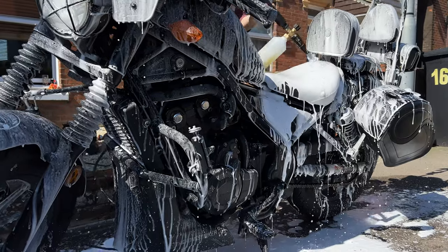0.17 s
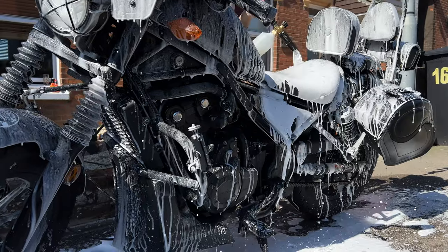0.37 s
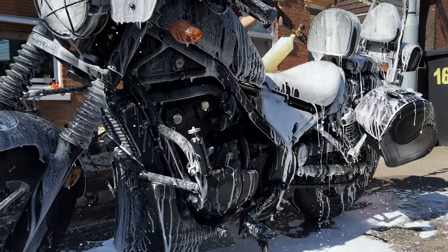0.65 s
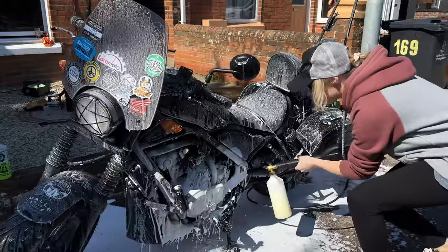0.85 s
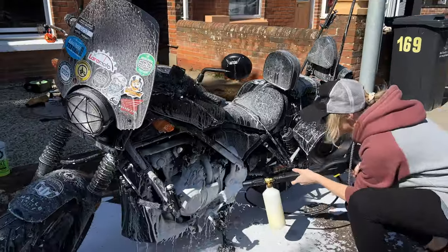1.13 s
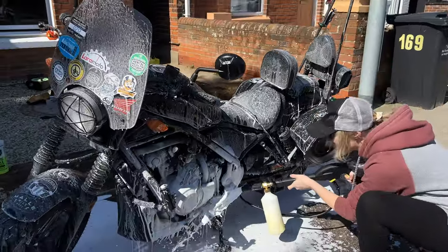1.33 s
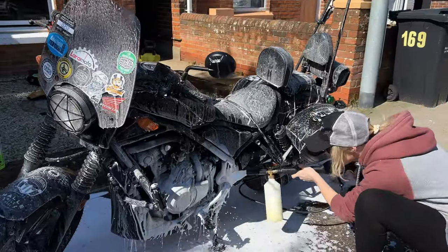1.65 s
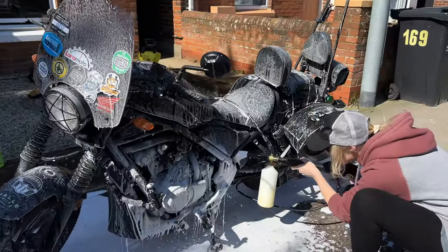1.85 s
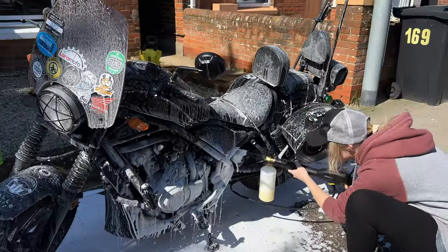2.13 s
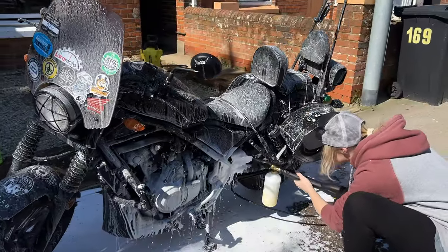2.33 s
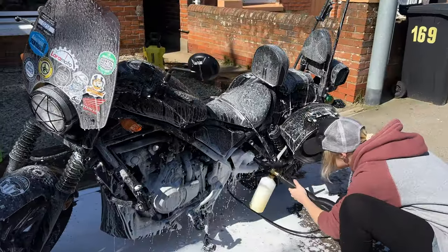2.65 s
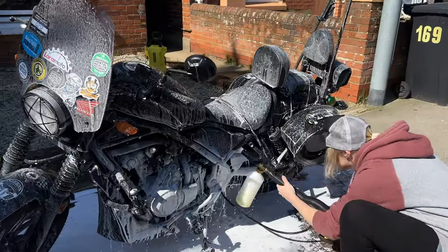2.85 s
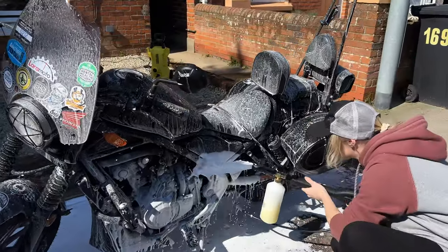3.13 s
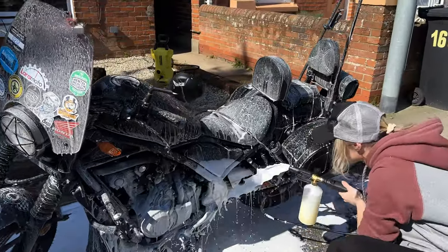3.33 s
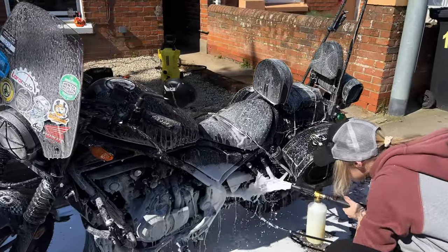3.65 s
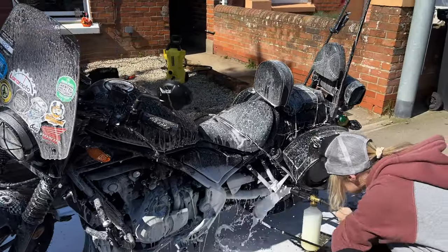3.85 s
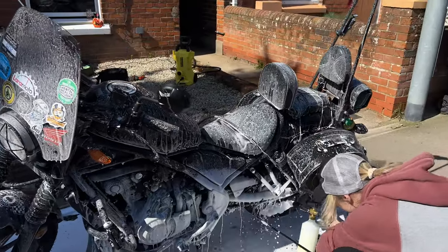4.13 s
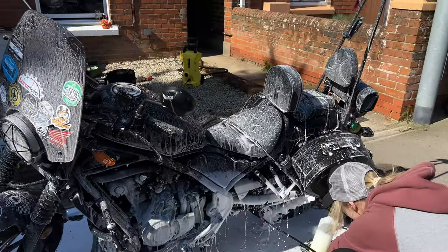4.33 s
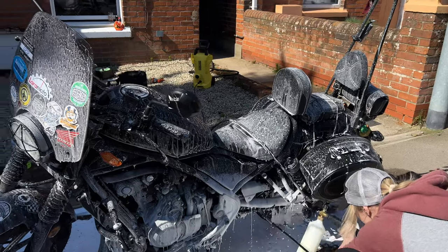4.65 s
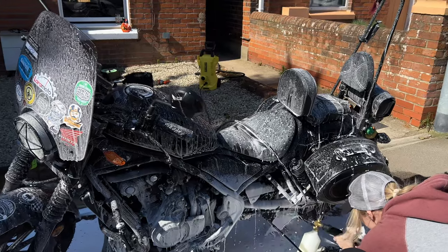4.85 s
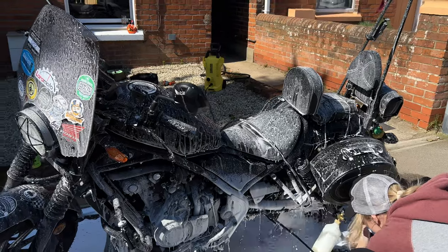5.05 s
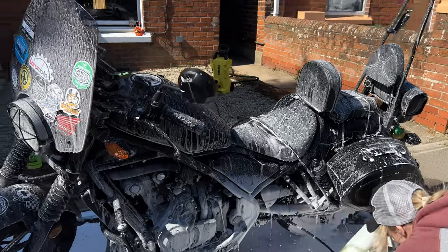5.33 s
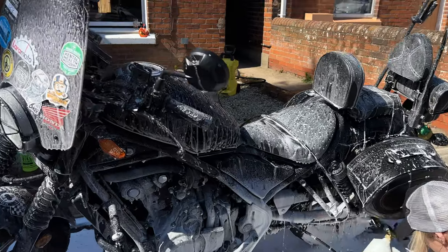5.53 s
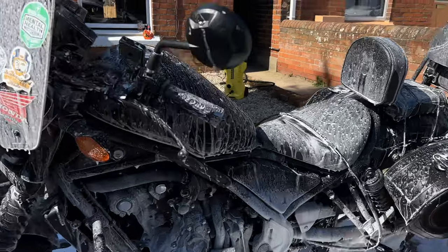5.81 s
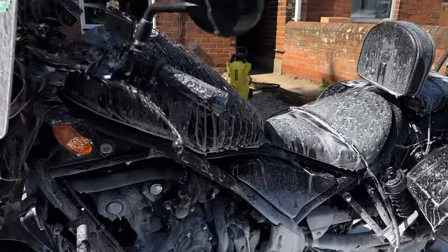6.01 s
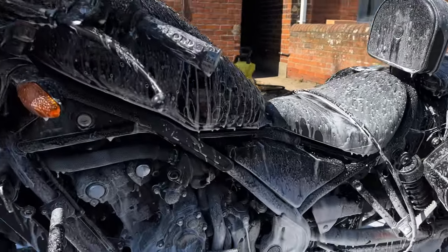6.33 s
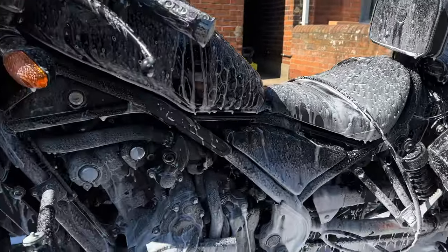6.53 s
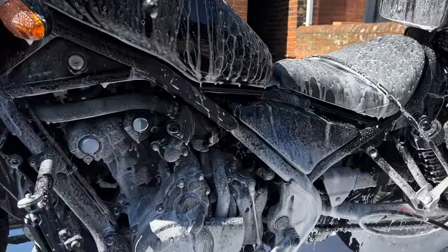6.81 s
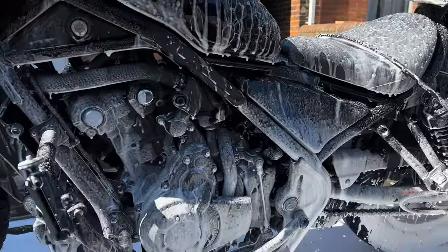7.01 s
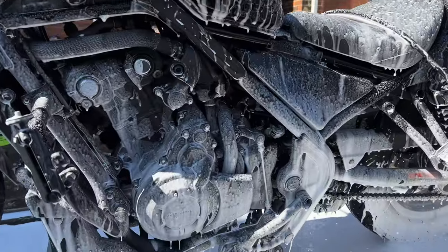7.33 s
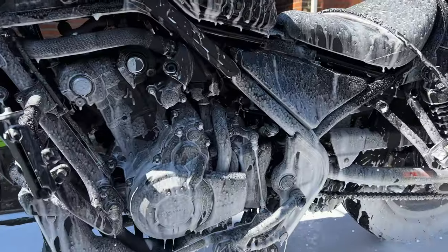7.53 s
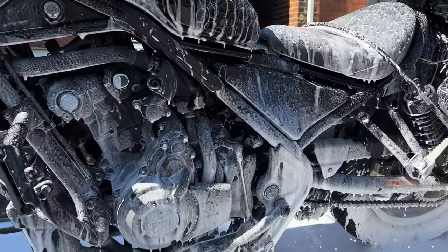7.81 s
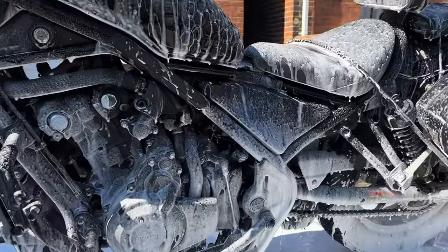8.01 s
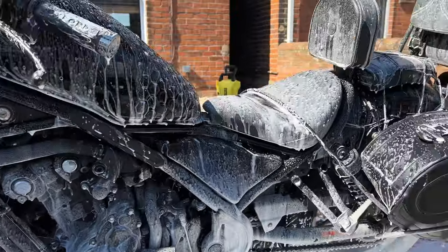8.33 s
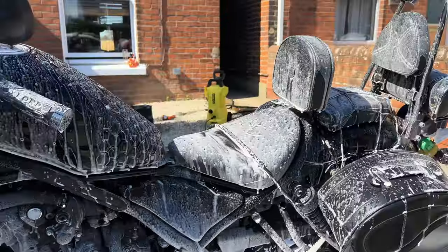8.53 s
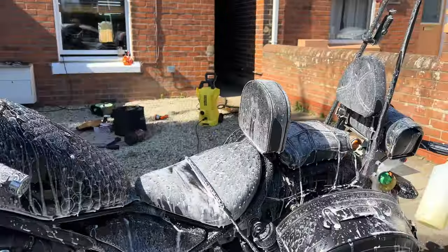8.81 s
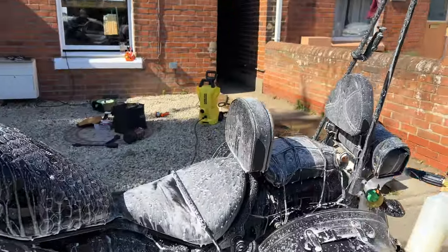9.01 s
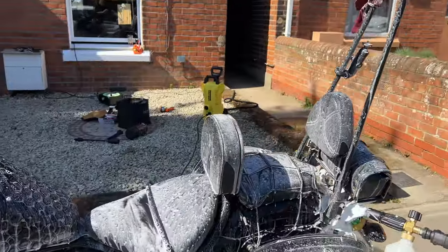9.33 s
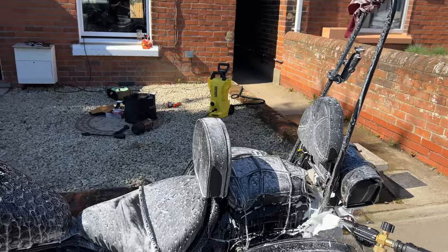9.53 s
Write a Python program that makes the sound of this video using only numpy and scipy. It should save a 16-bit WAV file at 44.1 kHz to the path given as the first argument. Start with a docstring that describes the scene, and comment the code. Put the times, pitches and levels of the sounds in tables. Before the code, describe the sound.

Steady motor roar with a thin high whine and foamy spray hiss in a brick-walled yard, wind buffeting the microphone more and more.

```python
"""A brick-walled yard: an electric pressure washer runs while foam sprays from its lance onto a motorcycle.
The listening place jumps at 0.76 s, then walks about: hum, whine, roar and hiss swell and fade with it.
The machine is made of sine tones locked to one motor speed, plus throbbing shaped noise.
The spray is noise with shifting resonances and a high fizz; three short knocks and a click are noise bursts.
The wind is low noise with gusts, plus thumps made of short tones that fall in pitch."""
import sys
import numpy as np
from scipy import signal
from scipy.fft import rfft, irfft, next_fast_len
from scipy.io import wavfile
from scipy.ndimage import uniform_filter1d, map_coordinates

SR = 44100
rng = np.random.default_rng(int(sys.argv[2]) if len(sys.argv) > 2 else 0)


def master(y):
    """Save y as 16-bit WAV."""
    cut = np.clip(np.atleast_2d(y).T, -1, 1)
    pcm = np.round(cut * 32767)  # scale
    wavfile.write(sys.argv[1], SR, pcm.astype(np.int16))


def how_loud(loudness_db):
    """Turn decibels into a plain amplitude multiplier (0 dB gives 1, 20 dB gives 10)."""
    steps = np.asarray(loudness_db, float) / 20
    return 10 ** steps


N = 426006  # length in samples

# Noise levels before and after the jump, ahead of fixed lifts: t/s, motor roar/dB, casing drone/dB, fizz/dB
NOISE_LEVELS = [
    [(0.0, -35, -47, -53), (0.322, -33.5, -41, -54.5), (0.61, -33.5, -38, -53.5), (0.755, -34, -40, -54)],
    [(0.77, -41, -55, -54), (0.84, -42, -45, -54), (1.76, -40.5, -43, -53), (3.27, -40, -43.5, -49),
     (4.73, -36.5, -40.5, -47.5), (5.62, -37, -43, -48.5), (6.04, -36.5, -42, -49.5), (6.07, -38, -38, -48),
     (6.19, -35, -41, -50), (7.6, -35.5, -37.5, -54), (8.77, -37, -39, -47), (8.94, -36, -44.5, -46.5),
     (9.26, -35.5, -41, -46), (9.66, -34, -40.5, -45.5)],
]
# Where the sources stand: t/s, how far the left side leads for the machine/ms, for the spray/ms
LEADS = [(0, .16, 0), (.76, .14, 0), (.77, .06, 0), (3.9, .05, 0), (4.6, .02, .2), (5.3, -.02, .27),
         (6.1, -.11, .3), (6.6, -.28, .3), (6.8, -.3, -.38), (7.4, -.34, -.38), (8, -.35, -.18),
         (8.5, -.3, .06), (8.7, .06, .06), (9.66, .02, .05)]
# Wind thumps: t/s, level of the main swing/dB, start f/Hz, end f/Hz, fall time (bell spread)/s
THUMP_LIST = [(2.305, -27, 75, 58, .02), (4.305, -25, 110, 65, .01), (6.088, -12, 190, 58, .016),
              (6.81, -18, 75, 60, .025), (6.947, -18, 110, 75, .01), (7.0, -14.5, 140, 60, .011),
              (7.808, -20, 65, 55, .018), (8.515, -13, 95, 88, .013), (8.674, -18, 130, 90, .006)]
RISE_SHARE = 0.7  # a thump's rise time over its fall time


def along(points, hz):
    """Reads a curve of (Hz, value) points on a logarithmic frequency axis."""
    f, v = np.transpose(points)
    return np.interp(np.log(hz + 1), np.log(f + 1), v)


def curves(rows):
    """Joins the points of each column after the time into one value per sample."""
    s, *cols = np.transpose(rows)
    return [np.interp(np.arange(N) / SR, s, c) for c in cols]


def unit(x):
    """Scales a sound to rms 1."""
    return x / np.sqrt(np.mean(x ** 2) + 1e-20)


def wobble(rate):
    """A smooth random curve through `rate` random points a second."""
    coarse = np.arange(0, N + 64, 64)
    knots = rng.standard_normal(int(N * rate / SR) + 4)
    smooth = map_coordinates(knots, [coarse * rate / SR])
    return np.interp(np.arange(N), coarse, smooth)


def filtered(x, response):
    """Filters x by multiplying its spectrum with a complex response of frequency."""
    m = next_fast_len(N + 8192)
    hz = np.fft.rfftfreq(m, 1 / SR)
    return irfft(rfft(x, m) * response(hz), m)[..., :N]


def bump(x, centre, width):
    """A bell of height 1 around a centre in frequency or time."""
    return np.exp(-((x - centre) / width) ** 2 / 2)


def swells(rows):
    """Summed power of bell-shaped swells, each (middle s, peak dB, bell spread s)."""
    coarse = np.arange(0, N + 64, 64)
    power = np.zeros(len(coarse))
    for s, db, spread in rows:
        power = power + (how_loud(db) * bump(coarse / SR, s, spread)) ** 2
    return np.interp(np.arange(N), coarse, power)


def rush(spectrum, patchy_db, streak_db=0, swish_db=0, lead_ms=np.zeros(N), colour_db=lambda hz, at: 0):
    """Stereo noise of rms 1 with short patches, long streaks from reflections and brief narrow swishes."""
    # How alike left and right are: f/Hz, likeness (1 = the same)
    alike = [(60, .66), (150, .7), (300, .72), (640, .3), (1400, .55), (3000, .6), (6000, .45), (7500, .6),
             (8500, .8), (9200, .945), (12000, .96), (15000, .95)]
    hz, t, z = signal.stft(rng.standard_normal((2, N)), SR, nperseg=512)
    hz = hz[:, None]
    at = np.minimum(t * SR, N - 1).astype(int)

    def field(rows, cols):
        """Random level map, smoothed over frequency rows and time columns."""
        across = uniform_filter1d(rng.standard_normal(z.shape[1:]), rows, 0)
        return unit(uniform_filter1d(across, cols, 1))

    texture_db = patchy_db * field(5, 16) + streak_db * field(2, 120) + swish_db * field(2, 30)
    z = z * how_loud(texture_db + colour_db(hz, at))
    turn = np.arccos(np.clip(along(alike, hz), -1, 1)) / 2
    mid, side = np.cos(turn) * z[0], np.sin(turn) * z[1]
    lead = np.exp(1j * np.pi * hz * lead_ms[at] / 1000)  # half the lead on each side
    left_right = np.array([(mid + side) * lead, (mid - side) / lead])
    pair = signal.istft(left_right, nperseg=512)[1][:, :N]

    def shape(f):
        """The wanted spectrum, falling 40 dB an octave above its last point."""
        beyond_db = -40 * np.log2(np.maximum(f / spectrum[-1][0], 1))
        return how_loud(along(spectrum, f) + beyond_db)

    return unit(filtered(pair, shape))


def tone(phase, db, waver_db, pan_db, lead):
    """A sine with a slightly unsteady level, placed left or right by level and by phase in radians."""
    level = db + waver_db * wobble(6)
    phase = phase + rng.uniform(0, 2 * np.pi)
    share = np.sqrt(2 / np.cosh(pan_db * np.log(10) / 20))  # makes the level the rms of the pair
    left = how_loud(level + pan_db / 2) * np.sin(phase + lead / 2)
    right = how_loud(level - pan_db / 2) * np.sin(phase - lead / 2)
    return share * np.array([left, right])


def roam(multiple, phase, db, waver_db):
    """A tone that drifts between left and right, as reflections shift along the walk."""
    return tone(multiple * phase, db, waver_db, 4 * wobble(1.133), 0.5 * wobble(1.237))


def motor_turning():
    """Adds up the motor speed into the phases of the gear teeth and the pump, which stay locked together."""
    # Motor speed as the load on the pump changes: t/s, gear tooth f/Hz
    speed = [(0, 2744), (.755, 2744), (.77, 2729), (2.5, 2729), (2.75, 2733), (4.4, 2735), (5.6, 2744),
             (6.9, 2741), (7.75, 2737), (7.95, 2724), (9.66, 2725)]
    mesh = 2 * np.pi * np.cumsum(curves(speed)[0]) / SR
    return mesh, mesh / 37.69  # gear teeth meeting per pump cycle


def gear_whine(mesh):
    """Meeting gear teeth make a tone with overtones and an echo off the wall, blurred by loose play."""
    # Whine before and after the jump, ahead of the lifts below:
    # t/s, fundamental level/dB, third harmonic level/dB, wall echo level/dB
    whine_levels = [
        [(0.05, -55, -54, -58), (0.06, -62, -53, -58), (0.755, -59, -53, -58)],
        [(0.77, -52, -56, -50), (0.96, -62, -62, -50), (1.11, -55, -63, -48), (1.44, -49.5, -57, -46),
         (1.58, -50.5, -68, -46), (2.17, -59, -61, -53), (3.06, -58, -55, -51), (3.38, -51.5, -57, -47),
         (5.67, -55, -58, -50), (6.66, -47.5, -54, -50), (7.1, -60, -60, -50), (7.33, -54, -59, -52),
         (7.87, -55, -60, -55), (7.99, -48, -66, -50), (8.04, -54, -54, -50), (8.29, -49, -57, -50),
         (8.36, -56.5, -64, -50), (8.76, -42, -52.5, -47), (9.12, -52.5, -55, -48), (9.42, -40.5, -48.5, -50),
         (9.55, -41, -54, -50), (9.62, -41, -49, -50)],
    ]
    # Weaker harmonics: multiple of the tooth rate, level added to the third's table level/dB (lifted below)
    overtones = [(2, -12), (4, -12), (5, -15)]
    first_db, third_db, echo_db = curves(np.vstack(whine_levels))
    flutter = mesh + 0.3 * wobble(20)  # backlash, the loose play of the teeth
    whine = tone(flutter, first_db + 2.8, 2.2, 6.5, 0)  # 6.5 dB stronger on the left
    whine += roam(3, flutter, third_db + 3.5 + 2.5 * wobble(12), 1.2)
    echo_phase = flutter + 0.86 * wobble(2.7)
    whine += tone(echo_phase, echo_db, 1.5, 0, np.pi)  # the echo is in opposite phase left and right
    for multiple, db in overtones:
        whine += roam(multiple, flutter, third_db + db + 3.0, 3.5)
    mains_ripple = 0.21 * np.sin(2 * np.pi * 100 * np.arange(N) / SR)  # 100 Hz ripple in the torque
    return whine * (1 + mains_ripple)


def pump_hum(pump):
    """The pump shakes its casing at multiples of its rate, some swelling at loud spots in the yard."""
    # Strongest hum tones before and after the jump, ahead of a 1.5 dB lift:
    # t/s, third multiple of the pump rate level/dB, sixth multiple level/dB
    strong_levels = [
        [(0.05, -37.5, -54), (0.556, -35.5, -57), (0.755, -57, -62)],
        [(0.77, -53, -44), (0.82, -50, -44), (2.96, -47.5, -43), (3.48, -42, -36.5), (4.47, -43, -38),
         (7.3, -41, -43), (7.72, -40, -47), (8.71, -42.5, -44.5), (9.4, -40.5, -40.5), (9.5, -39, -50),
         (9.62, -37, -43)],
    ]
    # Fainter casing tones: multiple of the pump rate, steady level/dB
    casing_tones = [(4, -55.5), (4.38, -48), (5, -53), (5.4, -47.5), (7, -61), (8, -66), (8.38, -54.5),
                    (9, -59), (10, -57.5), (11, -57), (13, -57), (15, -57), (16, -55.5), (19, -58),
                    (25, -53)]
    # Casing tones swell where the walk crosses a loud spot:
    # multiple, middle t/s, peak level of the added swell/dB, bell spread/s
    loud_spots = [(5, 0.49, -41.5, 0.41), (5, 5.8, -41, 0.28), (5, 7.16, -40, 0.37), (5, 8.22, -42.5, 0.64),
                  (8, 0.62, -45.5, 0.11), (8, 4.45, -45, 0.84), (8, 5.55, -46.5, 0.56),
                  (8, 7.47, -44.5, .7), (8, 8.9, -45, 0.56), (9, 3.6, -48.5, 1.14), (9, 7.55, -48, 0.57),
                  (9, 9.4, -41.5, 0.43), (11, 0.2, -40.5, 0.33), (11, 3.16, -46.5, 0.68),
                  (11, 6.25, -45, 0.31), (11, 7.87, -43.5, 0.63), (15, 0.6, -43, 0.12),
                  (15, 4.54, -47, 0.58), (15, 9.5, -48.5, .5), (19, 0.56, -48, 0.38),
                  (19, 1.6, -52.5, 0.88), (19, 5.6, -50.5, 0.51), (19, 8.04, -54, 0.78)]
    third_db, sixth_db = curves(np.vstack(strong_levels))
    hum = roam(3, pump, third_db + 1.5, 1.64) + roam(6, pump, sixth_db + 1.5, 1.64)
    for multiple, db in casing_tones:
        spots = [row[1:] for row in loud_spots if abs(row[0] - multiple) < 0.3]
        level_db = 10 * np.log10(how_loud(2 * db) + swells(spots))
        hum += roam(multiple, pump, level_db, 2.0)
    return hum


def motor_roar(pump):
    """Broad motor noise and casing drone, coloured by the housing and throbbing with the pistons."""
    # Roar before the jump: f/Hz, level per Hz/dB (relative)
    near_spectrum = [(60, -17), (140, 1), (200, 2), (300, 1), (550, -0.5), (800, 0.5), (1100, 2),
                     (1500, -4.5), (2000, -5), (2500, -7), (3500, -18.5), (5000, -21.5)]
    # Roar after the jump: f/Hz, level per Hz/dB (relative)
    far_spectrum = [(300, -24), (550, -5), (800, -4), (1100, -2), (1500, -2.5), (2000, -4.5), (2500, -5.5),
                    (3200, -16), (4500, -36)]
    # Casing drone after the jump: f/Hz, level per Hz/dB (relative)
    drone_spectrum = [(120, -18), (170, -9), (220, -1.5), (300, 2.5), (420, -1), (550, -5), (800, -11.5),
                      (1200, -23)]
    # Motor housing resonances: centre f/Hz, bell width/Hz, boost/dB
    housing_peaks = [(1144, 170, 1), (1805, 30, 4), (2100, 110, 3)]
    # The roar brightens as the lance sweeps past: t/s, boost around 1800 Hz/dB
    opening = [(0, -0.5), (.25, -1), (.35, 4), (.6, -0.5), (.76, 0)]
    roar_db, drone_db, _ = curves(np.vstack(NOISE_LEVELS))
    lead_ms = curves(LEADS)[0]

    def housing(hz, at):
        return sum(db * bump(hz, centre, width) for centre, width, db in housing_peaks)

    def sweep(hz, at):
        return curves(opening)[0][at] * bump(hz, 1800, 850)

    far_roar = rush(far_spectrum, patchy_db=0.75, streak_db=2.0, lead_ms=lead_ms, colour_db=housing)
    drone = rush(drone_spectrum, patchy_db=0.3, streak_db=1.2, lead_ms=lead_ms)
    far = how_loud(roar_db + 2.22) * far_roar + how_loud(drone_db + 3.5) * drone
    near_roar = rush(near_spectrum, patchy_db=1.26, streak_db=1.0, lead_ms=lead_ms, colour_db=sweep)
    near = how_loud(roar_db + 5.5) * near_roar
    throb = 1 + 0.055 * np.sin(3 * pump) + 0.061 * np.sin(pump)
    before_jump = np.arange(N) < 0.762 * SR  # the listening place jumps at 0.762 s
    return how_loud(0.56 * wobble(7)) * throb * np.where(before_jump, near, far)


def machine():
    """One motor speed drives the gear whine, the pump hum and the throb of the roar."""
    mesh, pump = motor_turning()
    return gear_whine(mesh) + pump_hum(pump) + motor_roar(pump)


def lance_hiss():
    """Foam rushing from the lance makes noise that shifts between three resonances."""
    # Hiss: f/Hz, level per Hz/dB (relative)
    hiss_spectrum = [(1500, -21), (2500, -0.5), (3200, -1.5), (4000, 2), (5000, 0.5), (5800, 1), (6600, -4),
                     (7500, -13), (9000, -35)]
    # Resonances of the jet among the metal parts: centre f/Hz, bell width/Hz
    jet = [(3350, 250), (4750, 340), (5700, 420)]
    # Strength of the jet before and after the jump, ahead of lifts:
    # t/s, first resonance level/dB, second level/dB, third level/dB
    swoosh_levels = [
        [(0.0, -53.5, -56, -58), (0.336, -50, -54, -54), (0.755, -52, -55, -57)],
        [(0.77, -55, -53, -52), (1.02, -55, -52, -53), (1.86, -56, -53, -49), (2.33, -51.5, -50, -54),
         (5.92, -50.5, -52, -48.5), (5.97, -48.5, -49, -46), (6.34, -49, -49.5, -50), (6.93, -46, -49.5, -50.5),
         (7.11, -48.5, -44, -53), (7.78, -54.5, -49, -48), (8.1, -50, -43, -53), (8.27, -56, -50, -47.5),
         (9.54, -44, -50.5, -45.5), (9.66, -51, -49, -44)],
    ]
    levels = np.array(curves(np.vstack(swoosh_levels)))
    mean_db = levels.mean(0)

    def swoosh(hz, at):
        parts = zip(jet, levels - mean_db)
        return sum((db[at] + 5.0) * bump(hz, centre, width) for (centre, width), db in parts)

    noise = rush(hiss_spectrum, patchy_db=0.84, streak_db=1.56, swish_db=2.0,
                 lead_ms=curves(LEADS)[1], colour_db=swoosh)
    return how_loud(mean_db + 10.0 + 0.37 * wobble(9)) * noise


def foam_fizz():
    """Foam fizzing on the paint is very high noise with a slowly changing level."""
    # Fizz: f/Hz, level per Hz/dB (relative)
    fizz_spectrum = [(5000, -25), (6600, 0), (7500, 1), (9000, .5), (10000, -1), (11500, 0), (13000, -1),
                     (14500, -4), (15500, -7), (17000, -30)]
    fizz_db = curves(np.vstack(NOISE_LEVELS))[2] + 5 + 0.44 * wobble(8.9)
    return how_loud(fizz_db) * rush(fizz_spectrum, patchy_db=1.45, streak_db=1.4)


def spray():
    """The jet's hiss and the foam's fizz together."""
    return lance_hiss() + foam_fizz()


def wind_buffeting():
    """Lumpy low wind noise swells with gusts; a brighter flapping grows faster than the wind does."""
    # Steady wind before and after the jump, ahead of a 0.7 dB lift: t/s, buffet level/dB
    steady_wind = [
        [(0, -43), (.755, -35)],
        [(.77, -51), (2, -49.5), (3.3, -44.5), (5.2, -43.5), (5.6, -35.5), (6.4, -38.5), (7.1, -31),
         (8.3, -32.5), (8.8, -35.5), (9.66, -41.5)],
    ]
    # Gusts on top of it, with the same lift: middle t/s, peak level of the added gust/dB, bell spread/s
    gusts = [(.068, -36, .04), (.27, -31, 0.021), (.55, -35, 0.082), (.735, -29, .014), (1.19, -50, .02),
             (1.34, -48, .05), (1.88, -45, .04), (2.11, -42, .04), (2.47, -37.5, 0.023), (2.58, -39, .03),
             (3.43, -40, .04), (4.71, -41, .025), (5.62, -34, .03), (5.92, -34, 0.054), (6.24, -37, 0.032),
             (6.72, -25.5, .035), (7.12, -29, .04), (7.33, -38, .03), (7.43, -30, .06),
             (7.75, -28.5, 0.036), (8.39, -29.5, .025), (8.59, -29, 0.032), (8.68, -33, .04),
             (8.94, -28, .03), (9.06, -32, .025), (9.21, -31, .04), (9.36, -42, .03), (9.59, -36, .04)]
    # Buffeting: f/Hz, level per Hz/dB (relative)
    buffet_spectrum = [(20, -42), (32, -19), (42, -5.5), (60, 0.5), (90, -0.5), (140, -12.5), (200, -15.5),
                       (350, -33), (700, -33)]
    # Flapping: f/Hz, level per Hz/dB (relative)
    flap_spectrum = [(60, -22), (120, -2.5), (170, -3.5), (250, -12), (400, -8), (700, -42)]
    restless_db, lumpy_db = 1.2, 1.8  # chance in the wind: slow, fast
    carriers = [(s, db - 5.5, 1.5 * fall) for s, db, _, _, fall in THUMP_LIST]  # a gust carries each thump
    steady_db = curves(np.vstack(steady_wind))[0] + restless_db * wobble(9)
    level_db = 10 * np.log10(how_loud(2 * steady_db) + swells(gusts + carriers))
    lumpy = unit(how_loud(lumpy_db * wobble(22)) * rush(buffet_spectrum, patchy_db=0.35))
    buffet = how_loud(level_db + 0.7) * lumpy
    flap = how_loud(1.5 * (level_db + 34.5) - 46.5) * rush(flap_spectrum, patchy_db=5.0)
    return buffet, flap


def wind_thumps():
    """The strongest eddies push the microphone: short tones falling in pitch, and the calm they leave."""
    t = np.arange(N) / SR
    thumps, calm = np.zeros(N), np.ones(N)
    for s, db, start_hz, end_hz, fall in THUMP_LIST:
        u, rise = t - s, RISE_SHARE * fall
        shape = bump(u, 0, np.where(u < 0, rise, fall))
        hz = end_hz + (start_hz - end_hz) / (1 + np.exp(np.clip(u / 0.005, -50, 50)))
        turns = np.cumsum(hz) / SR
        phase = 2 * np.pi * (turns - turns[round(s * SR)])  # zero at the thump's middle
        octave = how_loud(-11.5) * shape * np.cos(2 * phase)
        thumps -= how_loud(db) * shape * (np.cos(phase) + octave)
        calm *= 1 - 0.85 * bump(u, 0, rise + fall)  # a thump takes the place of the buffeting
    return thumps, calm


def wind():
    """Buffeting and flapping give way to each thump."""
    buffet, flap = wind_buffeting()
    thumps, calm = wind_thumps()
    return calm * buffet + np.sqrt(calm) * flap + thumps


def knocks():
    """Three short knocks, and at 8.07 s a brighter click: sudden bursts of band noise that die away."""
    # Knocks and click: t/s, starting rms level/dB, centre f/Hz, bell width/Hz, time to fall 60 dB/s
    bursts = [(.047, -26, 2000, 1000, .035), (3.181, -26, 2000, 900, .022), (3.532, -27, 1500, 1200, .08),
              (8.0665, -25, 5000, 2800, .009)]
    t = np.arange(N) / SR
    total = np.zeros(N)
    for s, db, centre_hz, width_hz, t60 in bursts:
        band = filtered(rng.standard_normal(N), lambda hz: bump(hz, centre_hz, width_hz))
        decay = how_loud(db - 60 * np.abs(t - s) / t60) * (t >= s)
        total += decay * unit(band)
    return total


def scene():
    """Washer, spray, wind and knocks together."""
    return machine() + spray() + wind() + knocks()


def top_cut(x):
    """Nothing passes above the cut-off."""
    return signal.sosfilt(signal.butter(12, 15800, fs=SR, output="sos"), x)


def record(dry):
    """Left and right get a fixed level difference and, in the treble, a fixed phase difference."""
    # Level difference: f/Hz, left over right/dB
    tilt = [(100, 0), (400, -1.4), (1000, -0.5), (3000, 1.5), (6000, 1.5), (9000, 1)]
    # Treble phase difference: f/Hz, left behind right/rad
    phase_gap = [(6800, 0), (7500, .3), (8300, 1.1), (9000, 2.1), (9700, 3), (10500, 3.4), (11300, 4.3),
                 (12100, 5.2), (12700, 6), (14800, 6.7), (15600, 9.1)]

    def sides(hz):
        """Half of each difference goes to the left, half the other way to the right."""
        return np.array([how_loud(s * along(tilt, hz)) * np.exp(-1j * s * along(phase_gap, hz))
                         for s in (0.5, -0.5)])

    mix = filtered(dry, sides)
    return top_cut(mix)


dry = scene()
out = record(dry)
master(out)
```